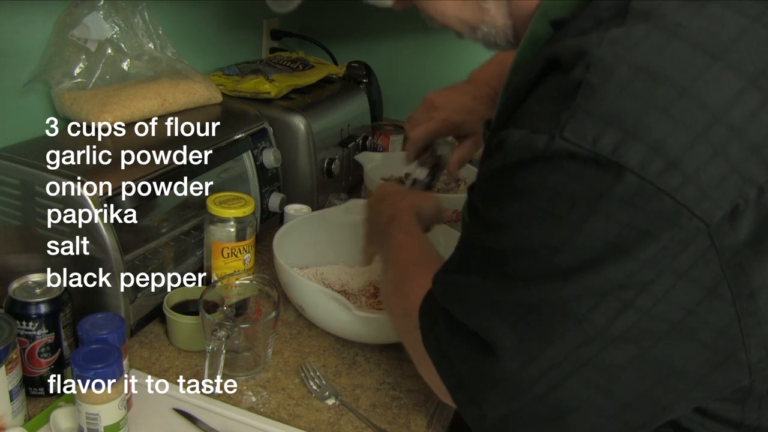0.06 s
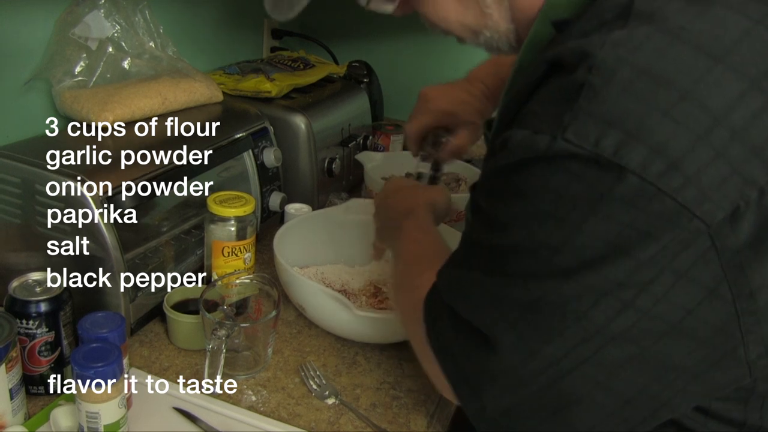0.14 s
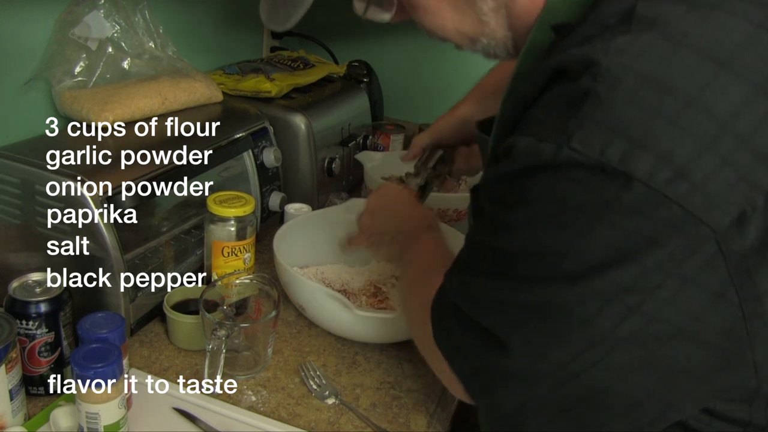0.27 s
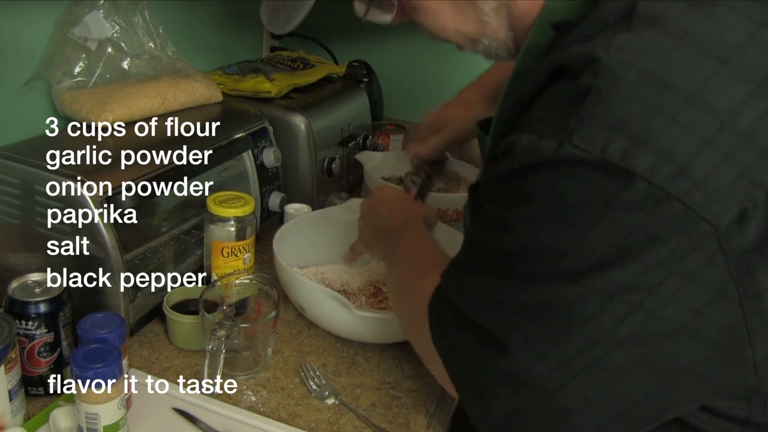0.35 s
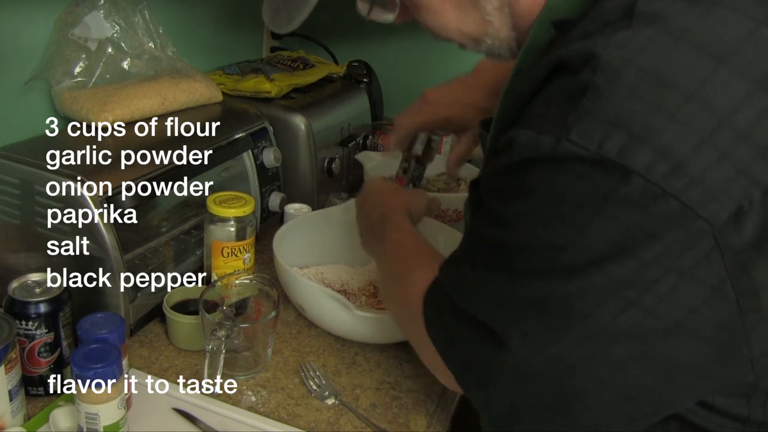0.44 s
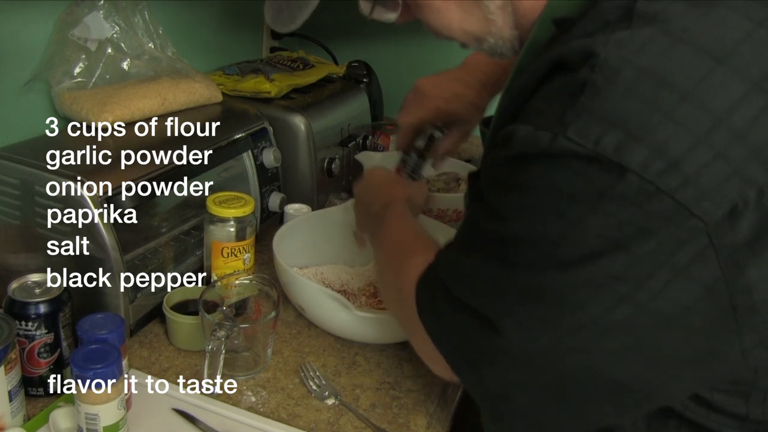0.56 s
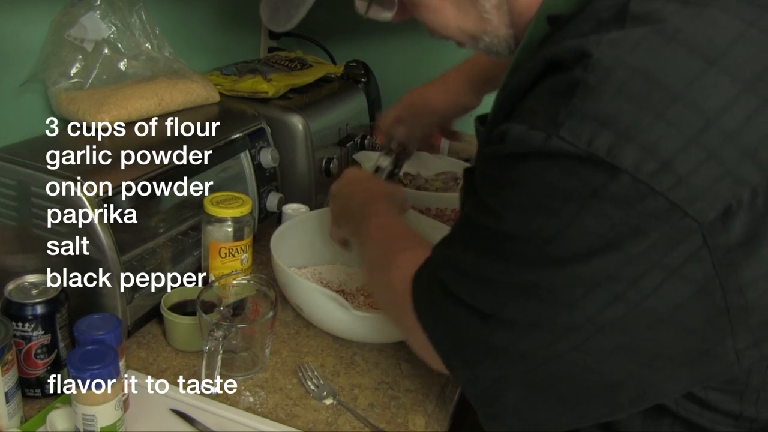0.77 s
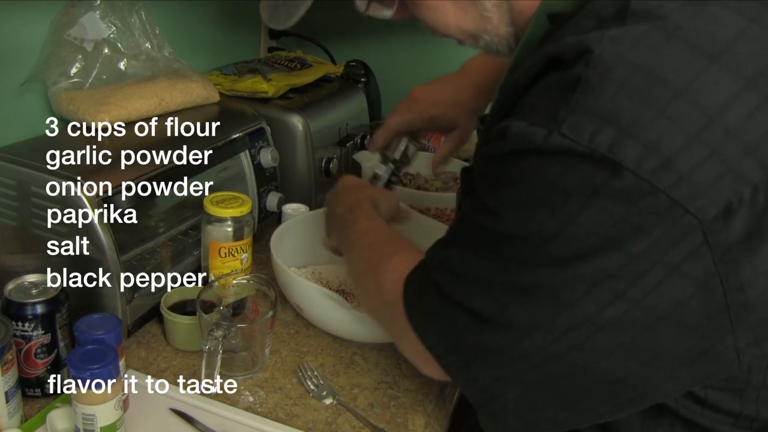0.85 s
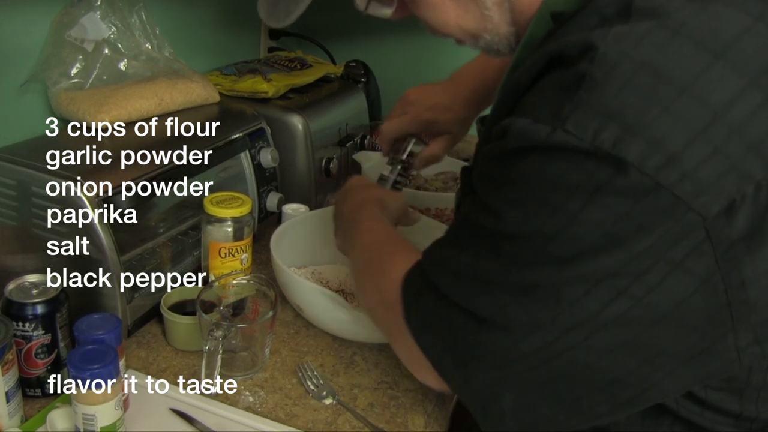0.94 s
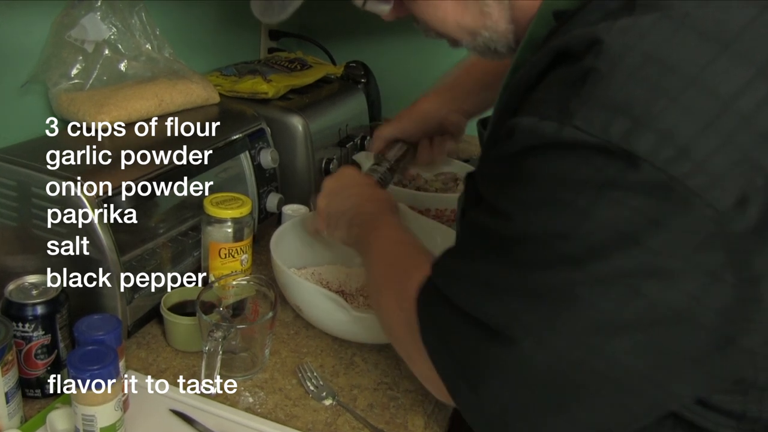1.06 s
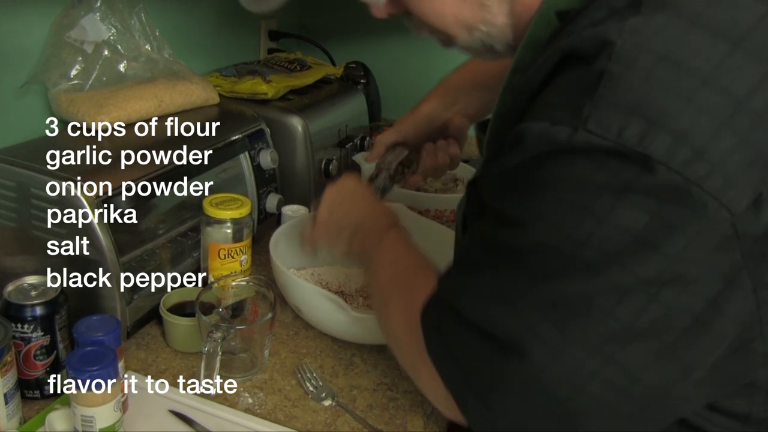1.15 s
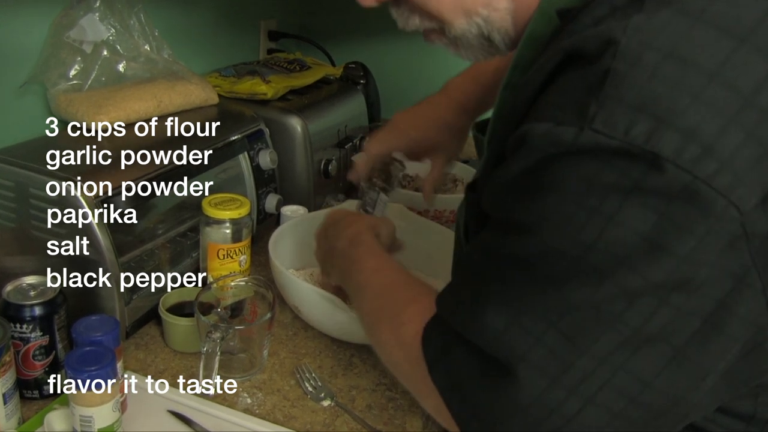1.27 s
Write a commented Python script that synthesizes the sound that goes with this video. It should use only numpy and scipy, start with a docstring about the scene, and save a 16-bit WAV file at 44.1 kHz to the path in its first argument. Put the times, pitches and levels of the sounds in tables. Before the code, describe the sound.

A hand pepper mill gives three short, dry, gritty crunches in a small, hard kitchen.

```python
"""Three dry, gritty crunches with sharp cracks: a hand pepper mill twisted over a bowl in a small, hard kitchen.
Each twist is a dense run of tiny random noise bursts, the fractures, plus a few longer bursts for cracking corns.
Both ring the decaying sine modes of the mill; juddering rasps ring them too, and soft slides come as bell-shaped rubs.
Filtered decaying noise makes the echoes of counter and walls; hum partials and coloured noise lie beneath,
with dull low knocks of handling and the fading echo of an earlier twist."""
import sys
import numpy as np
from scipy import signal
from scipy.fft import rfft, irfft
from scipy.io import wavfile
from scipy.ndimage import uniform_filter1d

SR = 44100
rng = np.random.default_rng(int(sys.argv[2]) if len(sys.argv) > 2 else 0)


def wav_out(sig):
    """Save sig, one row per channel (or a flat mono array), as 16-bit PCM at SR to the path in sys.argv[1]."""
    wavfile.write(sys.argv[1], SR, np.round(np.clip(np.atleast_2d(sig).T, -1, 1) * 32767).astype(np.int16))


N = 57330
T = np.arange(N) / SR  # s

# colour of the crunch, relative: f/Hz, level/dB in the first twist, in the second, in the third
CRUNCH = [(61.7, -38, -63, -66), (215, -22, -25.5, -25), (425.5, -15, -17.5, -23), (679.6, -13, -9, -5),
          (856, -36, -21, -28), (1160, -5, -10, -9), (1540, -7.5, -4.5, 0), (2400, -0.5, 0.5, 0.5),
          (3280, -2.5, -1.5, 0.5), (4260, -0.5, 0, -3), (6850, 0.4, -0.5, 2.5), (9320, 3.5, -1, -3),
          (13500, -8, -6.5, -9), (15800, -13, -17, -18)]
GRAIN_RATE = 4000  # fractures per s in the crunch and the slides
WIDTH_DB = -5  # side against mid in the echoes


def undb(db):
    """Decibels to gain."""
    return 10 ** (np.asarray(db) / 20)


def unit(x):
    """Scale to an rms of 1."""
    return x / np.sqrt(np.mean(x ** 2))


def colour(x, points, tilt_db=0):
    """Minimum-phase filter through (Hz, dB) points, tilted in dB per octave; keeps the power of white noise."""
    hz, db = np.array(points).T
    octave = np.log2(np.maximum(np.fft.rfftfreq(2 * N, 1 / SR), 1))
    gain = unit(undb(np.interp(octave, np.log2(hz), db + tilt_db * np.log2(hz))))
    # folding the cepstrum onto positive times makes the filter causal
    cepstrum = irfft(np.log(gain))
    cepstrum[1:N] *= 2
    cepstrum[N + 1:] = 0
    response = np.exp(rfft(cepstrum))
    return irfft(rfft(x, 2 * N) * response)[:N]


def lowpass(x, hz, order=2):
    """Roll off above an edge."""
    return signal.sosfilt(signal.butter(order, min(hz, SR / 2 - 1), fs=SR, output="sos"), x)


def fade(t60):
    """Exponential decay by 60 dB in t60 seconds."""
    return np.exp(-np.log(1000) * T / t60)


def swell(at, half):
    """Bell-shaped rise and fall."""
    return np.exp(-.5 * ((T - at) / half) ** 2)


def walk(rate):
    """Random drift in straight ramps, rate new values per second, with a spread near 1."""
    k = int(SR / rate)
    steps = np.repeat(rng.standard_normal(N // k + 1), k)
    return uniform_filter1d(steps, k)[:N]


def stereo_noise(side_db):
    """Two noises that are mostly alike, and more so in the top treble."""
    mid, side = rng.standard_normal((2, N))
    side = lowpass(side, 9700)
    return mid + undb(side_db) * side * np.array([[1], [-1]])


def twist(force, tone):
    """Fractures follow the force on the burr and whole corns crack; both ring the mill. Gives a list of sounds."""
    # corns that crack: t/s, level/dB, decay/s, brightness/dB per octave
    cracks = [(0.2014, -16.5, 0.0016, 2), (0.2033, -19.5, 0.0013, -0.5), (0.2054, -19, 0.0039, -1),
              (0.239, -25, 0.0019, -2), (0.5942, -42, 0.0011, -11), (0.641, -30, 0.0016, 1),
              (0.6669, -16.5, 0.00074, 2), (0.671, -26, 0.0018, -0.5), (1.031, -44, 0.0012, -3.5),
              (1.0695, -16.5, 0.0024, 0), (1.0735, -12.5, 0.0017, .5)]
    at, db = np.array(force).T
    turning = (T > at[0]) * (T < at[-1])
    crunch = grains(GRAIN_RATE) * undb(np.interp(T, at, db)) * turning
    parts = [colour(crunch, tone)]
    for start, crack_db, length, tilt_db in cracks:
        if at[0] - .05 < start < at[-1] + .05:  # only the cracks of this twist
            decay = (T >= start) * np.exp(-np.abs(T - start) / length)
            burst = np.sign(rng.standard_normal(N)) * decay
            burst = unit(burst) * np.sqrt(length * SR / N)  # energy grows with length
            parts.append(undb(crack_db) * colour(burst, tone, tilt_db))
    return [part + undb(-18.5) * body(part) for part in parts]


def grains(rate):
    """Random fractures of mixed sizes, each a tiny noise burst; their power is evened out over 10 ms."""
    range_db, decay_s = 22, .0004  # largest over smallest, decay of each
    chance, size, sign = rng.random((3, N))
    energy = (chance < rate / SR) * undb(range_db * size ** 2) ** 2  # small ones are commoner
    power = signal.lfilter([1], [1, -np.exp(-2 / (decay_s * SR))], energy)
    evened = power / (uniform_filter1d(power, size=441) + 1e-3)
    return np.sign(sign - .5) * np.sqrt(evened)


def body(x):
    """The mill rings in its modes, each a decaying sine; the ring has unit energy."""
    # modes of the mill: f/Hz, relative level/dB, t60/s
    modes = [(1540, 7.5, 0.25), (1750, 0.5, 0.14), (1825, 10, 0.084), (1970, 4, 0.022), (2325, 7, 0.052),
             (2770, 5.5, 0.015), (3575, 12, 0.027), (4450, 13, 0.02), (6100, -34, 0.025), (7670, 3, 0.02),
             (7670, 7, 0.028), (8640, -21, 0.12), (11000, -14, .05)]
    ring = 0
    for hz, db, t60 in modes:
        strength = undb(db) / np.sqrt(t60)  # long modes get no extra energy
        ring = ring + strength * fade(t60) * np.sin(2 * np.pi * hz * T)
    return signal.fftconvolve(x, unit(ring) / np.sqrt(N))[:N]


def judders():
    """The burr catches and judders the body: blunt rasps of sparser grains, strongest near a centre pitch."""
    # catches of the burr: t/s at the middle, level/dB, half length/s, centre f/Hz
    catches = [(0.2082, -17.5, 0.0017, 2057), (0.253, -28.5, 0.0035, 2120), (0.306, -46, 0.0046, 2180),
               (0.447, -60, 0.0038, 1930), (0.598, -44, 0.0049, 2130), (0.636, -35, .008, 2400),
               (0.693, -39.5, 0.0085, 1860), (1.05, -31, 0.0023, 2020), (1.061, -24.5, 0.0054, 1970)]
    # colour of a rasp: multiple of the centre, relative level/dB
    rasp_tone = [(.1, -37), (.5, -21), (.7, -16.5), (.87, 3), (1.17, 1.5), (1.45, -8.5), (2.5, -15),
                 (8, -18)]
    push = 0
    for at, db, half, hz in catches:
        rasp = grains(2000) * undb(db) * swell(at, half)
        push = push + colour(rasp, np.array(rasp_tone) * [hz, 1])
    return push + undb(-14) * body(push)


def slides():
    """A faint, high rub of swelling grains as the hand slides back for a new grip."""
    # rubs of the hand: t/s at the middle, level/dB, half length/s
    rubs = [(0.548, -57, 0.011), (0.576, -56, 0.0073), (0.884, -59, 0.0041), (0.92, -61.5, 0.019),
            (1.239, -53, .004), (1.297, -61, 0.0092)]
    # colour of the rub: f/Hz, relative level/dB
    rub_tone = [(800, -9), (3000, -14), (7000, -22), (9800, -1), (12000, -14), (16000, -25)]
    pressure = sum(undb(db) * swell(at, half) for at, db, half in rubs)
    return colour(grains(GRAIN_RATE) * pressure, rub_tone)


def bumps():
    """Dull, quickly damped low sine knocks as the hands shift."""
    # soft bumps of handling: t/s, level/dB
    knocks = [(0.494, -83), (0.873, -52), (0.954, -52)]
    pitch_hz, rise_s = 249.3, .012
    out = 0
    for at, db in knocks:
        age = np.maximum(T - at, 0)
        envelope = age / rise_s * np.exp(1 - age / rise_s)
        out = out + undb(db) * envelope * np.sin(2 * np.pi * pitch_hz * age)
    return out


def kitchen(x):
    """Direct sound plus three ever later, longer and duller groups of reflections, as decaying noise."""
    # reflections from counter, cupboards and walls: delay/s, build-up/s, t60/s, level/dB, treble edge f/Hz
    echoes = [(.0004, .0005, 0.069, -2, 15000), (.005, .006, 0.18, -4.5, 13000),
              (0.01, .02, .58, -11.5, 8500)]
    pan_db = 2.3  # direct sound, left over right
    response = (T == 0) * undb(np.array([[pan_db], [-pan_db]]) / 2)
    for delay, rise, t60, db, edge_hz in echoes:
        shape = (1 - np.exp(-np.maximum(T - delay, 0) / rise)) * fade(t60)
        reflections = stereo_noise(WIDTH_DB) * unit(shape) / np.sqrt(N)
        response = response + undb(db) * lowpass(reflections, edge_hz)
    return signal.fftconvolve(x[None], unit(response) / np.sqrt(N), axes=1)[:, :N]


def appliance_hum():
    """Steady sine partials that waver a little in level and phase."""
    # hum partials: f/Hz, rms level/dB
    partials = [(120, -62), (240, -63.5), (253, -67), (377, -62), (453, -58.5), (479, -76.5), (651, -69),
                (888, -71)]
    hum = 0
    for hz, db in partials:
        level = undb(db - 0.5 * walk(11.84)) * np.sqrt(2)
        phase = 2 * np.pi * (hz * T + rng.random()) + 0.71 * walk(9.3)
        hum = hum + level * np.sin(phase)
    return hum


def room_air():
    """Coloured room noise whose bass is alike left and right."""
    # colour of the room noise: f/Hz, relative level/dB per Hz
    air_tone = [(20, -28), (40, -13), (60, -4), (90, -2.5), (160, -1), (240, 1), (330, -0.5), (450, 2.5),
                (600, -10.5), (850, -11.5), (1300, -18.5), (3000, -21), (9000, -29.5), (15000, -37)]
    mid, side = (colour(n, air_tone) for n in rng.standard_normal((2, N)))
    side = signal.sosfilt(signal.butter(2, 220, "high", fs=SR, output="sos"), side)
    return undb(-55.5) * (mid + undb(-5) * side * np.array([[1], [-1]]))


def lingering_echo():
    """The room still rings from an earlier twist: fading noise, a darkened copy of the third crunch colour."""
    tone = np.array(CRUNCH)[:, [0, 3]]
    linger = np.array([colour(n, tone, tilt_db=-2.2) for n in stereo_noise(WIDTH_DB)])
    return undb(-58) * fade(0.63) * linger


def scene():
    """Each sound of the mill gets its own random draw of kitchen echoes, so no one draw's ripple builds up;
    knocks, hum and room noise lie beneath."""
    # force on the burr, one list per twist: t/s, level of the crunch/dB
    forces = [
        [(0.185, -72), (0.188, -45), (0.2008, -39.5), (0.2016, -21), (0.210, -24.5), (0.214, -24), (0.230, -73),
         (0.242, -30), (0.257, -29.5), (0.264, -62)],
        [(0.592, -44.5), (0.604, -46.5), (0.621, -38), (0.626, -35.5), (0.645, -26), (0.669, -31), (0.678, -42),
         (0.700, -67), (0.715, -37)],
        [(1.013, -60), (1.030, -46), (1.042, -32.5), (1.045, -28), (1.054, -32.5), (1.062, -26.5), (1.082, -45),
         (1.089, -37), (1.120, -31.5)],
    ]
    parts = []
    for k, force in enumerate(forces):
        parts += twist(force, np.array(CRUNCH)[:, [0, k + 1]])
    parts += [judders(), slides()]
    mill = sum(kitchen(part) for part in parts)
    return mill + bumps() + appliance_hum() + room_air() + lingering_echo()


def record(dry):
    """A steep low-pass removes the treble above 16 kHz."""
    return signal.sosfilt(signal.ellip(10, .2, 70, 16000, fs=SR, output="sos"), dry)


dry = scene()
out = record(dry)
wav_out(out)
```